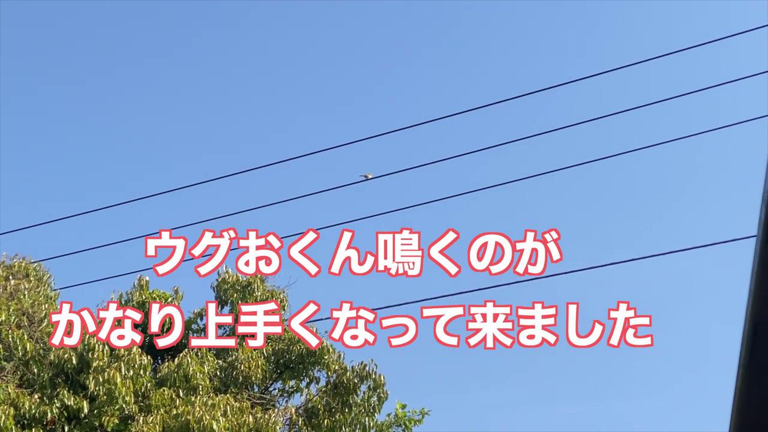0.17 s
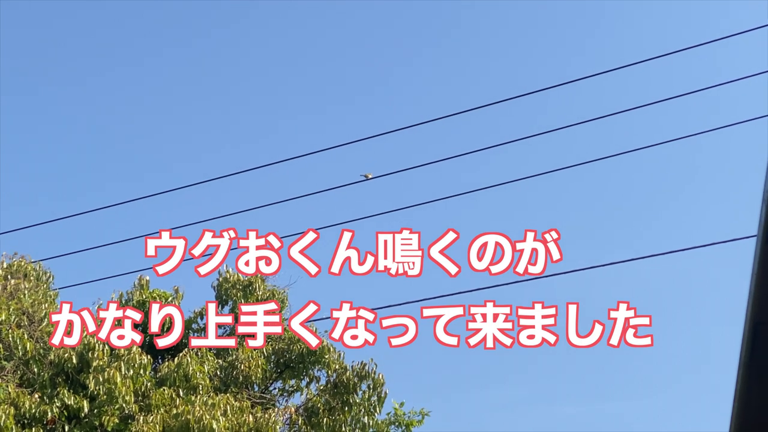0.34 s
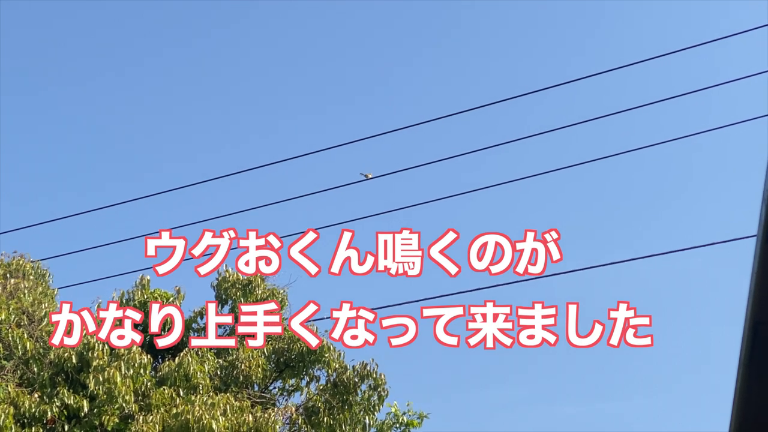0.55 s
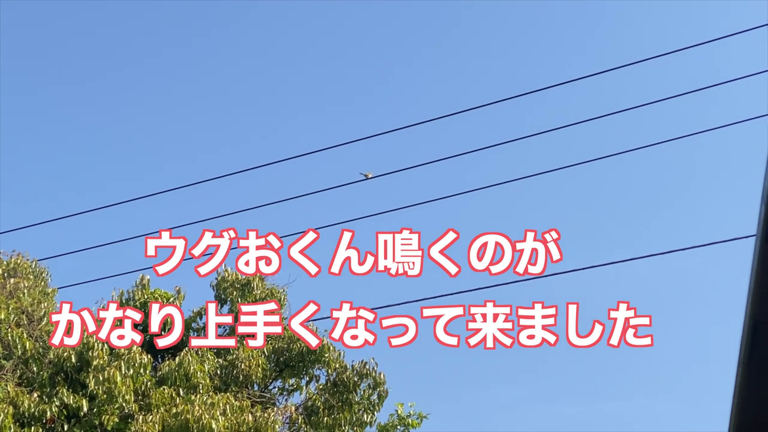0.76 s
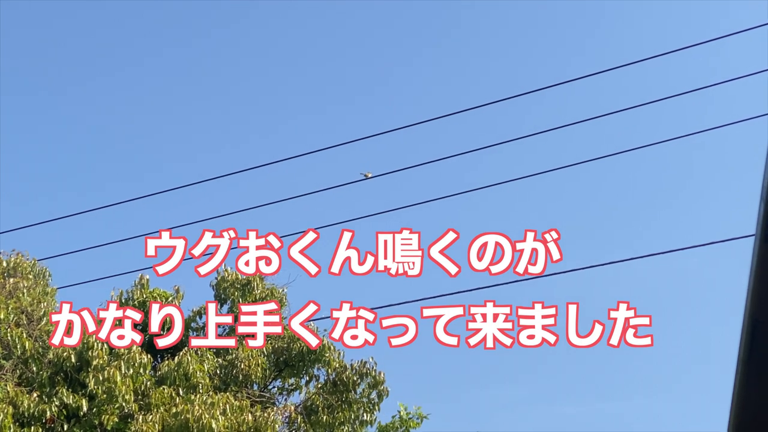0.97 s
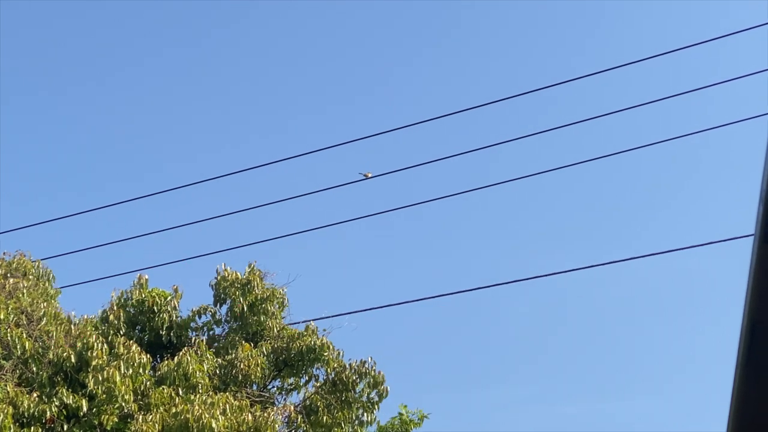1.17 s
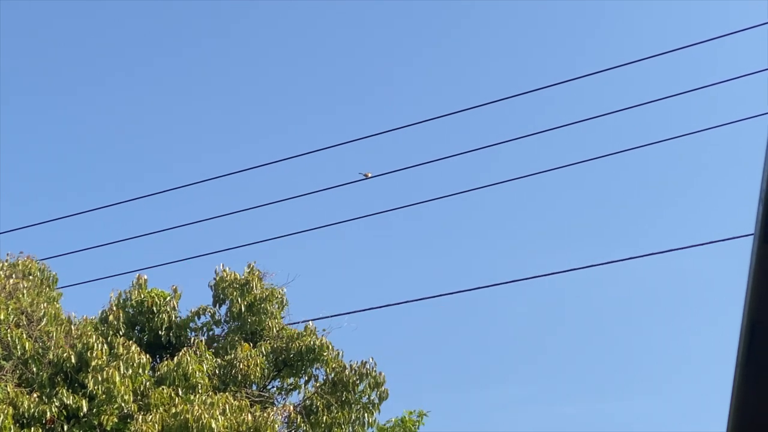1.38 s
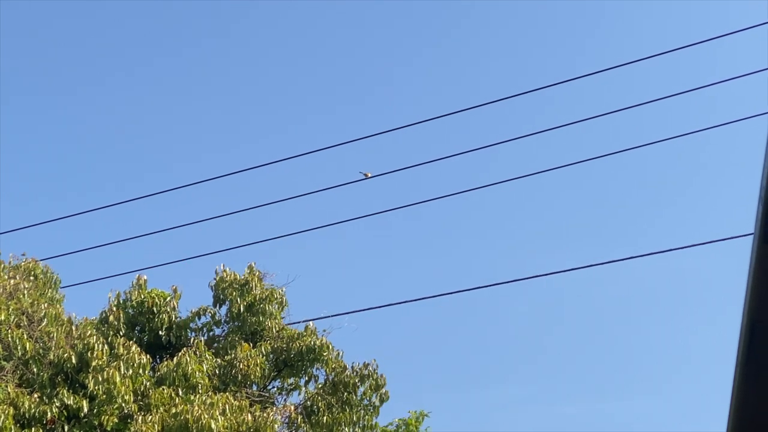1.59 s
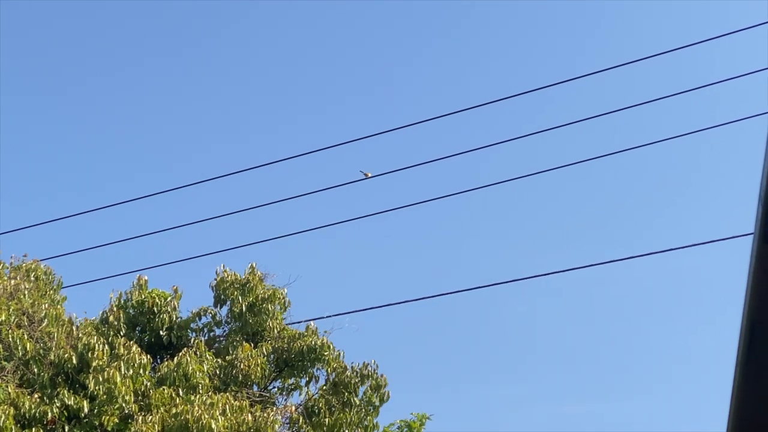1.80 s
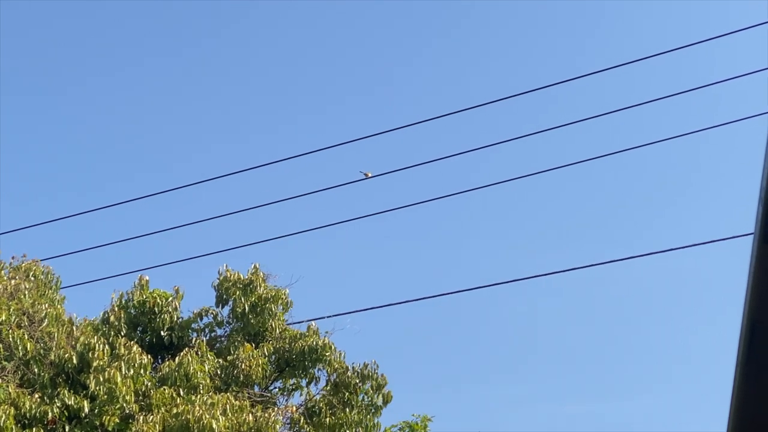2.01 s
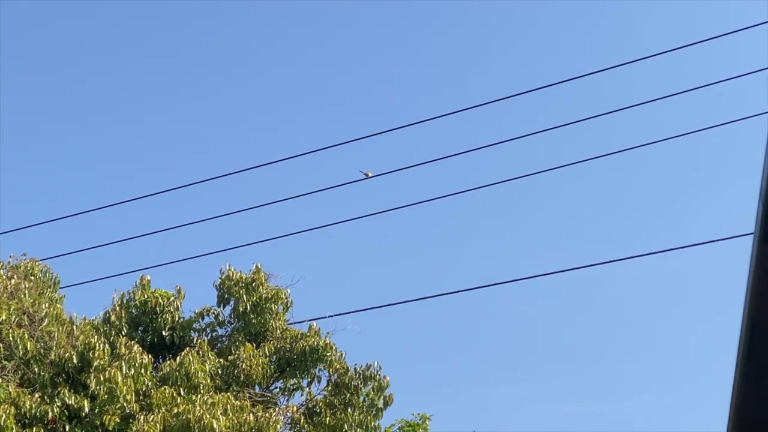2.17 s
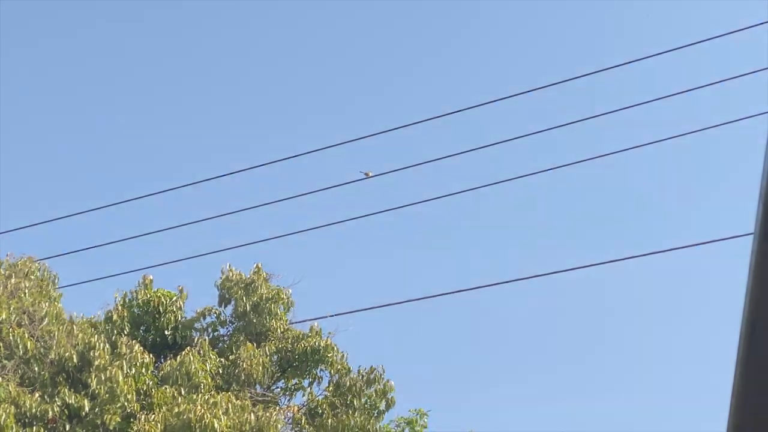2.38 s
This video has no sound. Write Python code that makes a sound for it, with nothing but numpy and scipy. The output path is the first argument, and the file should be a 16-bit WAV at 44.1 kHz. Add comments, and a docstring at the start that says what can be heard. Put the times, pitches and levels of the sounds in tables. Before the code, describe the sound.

A bush warbler sings outdoors, its clear low whistle swelling from the start and breaking into five even notes until 0.8 seconds. A louder, quick rising flourish follows, ending near 1 second in a whip-like downward sweep with brief reverberation. Faint distant birds, stirring leaves and a low, uneven rumble continue to about 2.5 seconds, with two soft, dull thumps near 1.3 and 2.1 seconds.

```python
"""A low whistle swells and breaks into five even notes: a bush warbler singing from a tree.
A quick, loud, rising flourish follows and ends in a whip-like downward sweep. Each part is a nearly
pure tone of varying frequency and amplitude, which the surroundings return as reflections and
reverberation. Other small birds call far off, over faint shaped noise (open air, stirring leaves,
a low, uneven rumble) and two dull thumps."""
import sys
import numpy as np
from scipy import signal
from scipy.fft import rfft, irfft
from scipy.io import wavfile
from scipy.ndimage import uniform_filter1d

SR = 44100
rng = np.random.default_rng(int(sys.argv[2]) if len(sys.argv) > 2 else 0)


def wav_record(signal):
    """Record a signal, one row per channel, as 16-bit PCM in the file named by sys.argv[1]."""
    frames = np.transpose(np.atleast_2d(signal))
    bounded = np.clip(frames, -1, 1)
    # unit amplitude maps onto the largest positive 16-bit level
    quanta = np.round(bounded * 32767).astype(np.int16)
    wavfile.write(sys.argv[1], SR, quanta)


N = 108045
TIME, FREQS = np.arange(N) / SR, np.fft.rfftfreq(N, 1 / SR)
BAND_LIMIT_HZ = 15700


def amp(db):
    """The decibel scale: 20 dB is a factor of ten in amplitude."""
    return 10 ** (np.asarray(db) / 20)


def unit_rms(x):
    """Normalisation to unit mean power."""
    return x / np.sqrt(np.mean(x ** 2) + 1e-20)


def curve_at(points, hz):
    """Interpolation of a curve on a logarithmic frequency axis."""
    f, value = np.transpose(points)
    return np.interp(np.log(hz + 1), np.log(f + 1), value)


def add(mix, start, sound):
    """Superposition: a sound adds to the mix from its start, in seconds."""
    part = mix[max(round(start * SR), 0):][:len(sound)]
    part += sound[:len(part)]


def delayed(x, seconds):
    """Propagation delay: the same wave arrives later."""
    return np.interp(np.arange(N) - seconds * SR, np.arange(N), x, left=0)


def phase_of(hz):
    """Phase is the time integral of angular frequency."""
    return 2 * np.pi * np.cumsum(hz) / SR


def wander(hz, count=N):
    """Random modulation: low-pass noise that fluctuates at rates up to about hz."""
    return unit_rms(irfft(rfft(rng.standard_normal(N)) * np.exp(-(FREQS / hz) ** 2), N))[:count]


def swell(middle, length, db):
    """Amplitude envelope: half a cosine cycle rises and falls around one moment."""
    return amp(db) * np.cos(np.pi * np.clip((TIME - middle) / length, -.5, .5))


def spread(a, b):
    """Partial coherence: the sum and difference of independent signals form left and right."""
    # likeness of the channels (frequency [Hz], coherence [0 to 1])
    coherence = [(30, 0.98), (110, 0.9), (190, 0.8), (330, 0.91), (600, 0.21), (1050, 0.36), (1500, 0.52),
                 (2200, 1), (3300, 0.9), (14000, 1)]
    size = len(a)
    alike = np.clip(curve_at(coherence, np.fft.rfftfreq(size, 1 / SR)), -1, 1)
    mid = irfft(rfft(a) * np.sqrt(1 + alike), size)
    side = irfft(rfft(b) * np.sqrt(1 - alike), size)
    return np.array([mid + side, mid - side])


def noise(spectrum):
    """Spectral shaping: white noise is filtered into coloured stereo noise of unit power."""
    white = rfft(rng.standard_normal((2, N)))
    return unit_rms(spread(*irfft(white * amp(curve_at(spectrum, FREQS)), N)))


def whistle(attack_s=0.009, release_s=0.011, sag_hz=27, waver=0.0035, arch_db=1, shimmer_db=1.33):
    """Harmonic tones: each note is a fundamental and a faint octave, sagging in pitch midway."""
    # whistled notes (start [s], length [s], final level [dB], pitch [Hz], swell [dB],
    # octave re fundamental [dB], pitch rise [Hz])
    notes = [(0.0, .178, -41.5, 955.7, 11.5, -18, -1), (0.207, 0.092, -37, 942, 1, -23, 33),
             (0.334, 0.081, -36, 955.3, 2, -19, 2), (.447, 0.079, -35, 954.3, 1.5, -20.5, 8),
             (0.556, .09, -35.5, 950.2, -1, -24, -5.5), (.679, .085, -32, 942.6, 6, -25.5, -6)]
    out = np.zeros(N)
    for start, length, db, hz, swell_db, octave_db, rise_hz in notes:
        t = np.arange(0, length, 1 / SR)
        progress = t / length
        bowl = (2 * progress - 1) ** 2  # 1 at the ends, 0 midway
        pitch = hz + rise_hz * (progress - .5) + sag_hz * (bowl - .25)
        phase = phase_of(pitch * (1 + waver * wander(82, len(t))))
        ramp = np.clip(np.minimum(t / attack_s, (length - t) / release_s), 0, 1)
        contour_db = db + swell_db * (progress - 1) + arch_db * (1 - bowl)
        envelope = np.sin(np.pi / 2 * ramp) ** 2 * amp(contour_db + shimmer_db * wander(90, len(t)))
        add(out, start, envelope * (np.sin(phase) + amp(octave_db) * np.sin(2 * phase)))
    return out


def background():
    """Amplitude-modulated noise: two uneven low bands and a growing hiss lie over steady air."""
    # noise spectra (frequency [Hz], relative spectral density [dB])
    boom_spectrum = [(22, -46), (30, -28), (38, -12), (51, 12.5), (66, -3), (82, -6), (105, -20.5),
                     (200, -55.5)]
    rumble_spectrum = [(55, -34), (95, -5), (135, 0), (185, -10), (250, -6.5), (350, -16), (520, -22.5),
                       (1100, -43), (2500, -61)]
    hiss_spectrum = [(500, -23.5), (1200, -6.5), (3000, 3.5), (7500, -0.5), (8500, -7), (12000, -9),
                     (13000, -26.5), (15500, -21.5)]
    air_spectrum = [(15, -32), (25, -12.5), (59, -2.5), (113, -12.5), (161, -9.5), (199, -9.5), (272, -6.5),
                    (532, -11.5), (603, -8.5), (728, -10.5), (1040, -10.5), (2120, -25), (3730, -31),
                    (4850, -69), (8210, -120)]
    # envelopes (time [s], relative level [dB])
    boom_levels = [(0, -54), (.25, -53), (.5, -54), (.66, -64), (1.04, -72.5), (1.12, -57), (1.22, -62),
                   (1.42, -58), (1.6, -60), (1.72, -64), (1.86, -48.5), (2.05, -55.5), (2.25, -63),
                   (2.45, -62)]
    rumble_levels = [(0.0, -59), (0.07, -47.5), (0.24, -51.5), (0.48, -45.5), (0.65, -55.5), (1.17, -65.5),
                     (1.4, -56), (1.43, -58.5), (1.61, -41.5), (1.66, -41.5), (1.69, -51.5), (1.71, -43.5),
                     (1.98, -49), (2.01, -44.5), (2.11, -50.5), (2.19, -46.5), (2.22, -57.5), (2.45, -64.5)]
    hiss_levels = [(0, -70.5), (0.799, -68), (1.3, -67.5), (1.7, -65.5), (2.1, -64), (2.45, -62.5)]
    boom = noise(boom_spectrum) * amp(np.interp(TIME, *np.transpose(boom_levels)))
    rumble = noise(rumble_spectrum) * amp(np.interp(TIME, *np.transpose(rumble_levels)))
    hiss = noise(hiss_spectrum) * amp(np.interp(TIME, *np.transpose(hiss_levels)))
    return amp(1) * boom + amp(-1.5) * rumble + hiss + amp(-55) * noise(air_spectrum)


def far_chirps(waver=0.0031):
    """Frequency modulation: distant birds slur each soft call along a parabola of pitch."""
    # calls (start [s], length [s], peak level [dB], first pitch [Hz], middle pitch [Hz], last pitch [Hz])
    calls = [(.01, 0.12, -59, 1460, 1440, 1320), (0.463, 0.12, -55, 3380, 3363, 3297),
             (0.586, 0.078, -50.5, 4335, 3915, 4100), (0.677, 0.047, -59, 4310, 4060, 3810),
             (1.113, 0.072, -56, 3440, 3340, 3156), (1.765, .07, -65, 2440, 2400, 2450),
             (2.182, .09, -62.5, 3570, 3570, 3570), (2.356, .1, -63, 4000, 4750, 5320)]
    out = np.zeros(N)
    for start, length, db, *pitches in calls:
        progress = np.arange(0, length, 1 / SR) / length
        pitch = np.polyval(np.polyfit([0, .5, 1], pitches, 2), progress)
        phase = phase_of(pitch * (1 + waver * wander(150, len(progress))))
        add(out, start, amp(db) * np.sin(np.pi * progress) * np.sin(phase))
    return out


def scatter(x, t60, build_s, taps_per_s=3000):
    """Reverberation: many small reflections from leaves and walls build up and decay exponentially."""
    t = np.arange(SR) / SR
    taps = rng.standard_normal((2, SR)) * (rng.random((2, SR)) < taps_per_s / SR)
    response = spread(*taps) * (1 - np.exp(-(t / build_s) ** 2)) * amp(-60 * t / t60)
    return signal.fftconvolve(x[None], response / np.linalg.norm(response[0]), axes=1)[:, :N]


def surroundings(song, notes):
    """Multipath propagation: early reflections, close scatter, a long tail and one distant echo."""
    # distinct close reflections (delay [s], gain [dB])
    reflections = [(0.0208, -24.5), (0.042, -27), (.058, -26.5)]
    early = sum(amp(db) * delayed(song, delay) for delay, db in reflections)
    rebound = amp(-13) * delayed(notes, seconds=.0255)  # the low whistle returns strongly from close by
    near = amp(-10) * scatter(song, t60=0.3, build_s=.008)
    tail = amp(-22) * scatter(song, t60=1.34, build_s=0.028)
    echo = amp(-38.5) * scatter(delayed(song, seconds=0.2), t60=0.096, build_s=0.0046)
    return early + rebound + near + tail + echo


def husk():
    """Band-limited noise: short bursts near the whistle's pitch turn it husky."""
    # husky band (frequency [Hz], relative spectral density [dB])
    spectrum = [(800, -38.5), (1050, -1), (1300, 0), (1600, -2), (1900, -11.5), (2500, -40.5), (5000, -69)]
    # husky moments (middle [s], length [s], peak level [dB])
    bursts = [(0.145, 0.1, -57), (0.221, 0.025, -54.5), (0.287, 0.015, -58), (0.401, 0.023, -54.5),
              (0.571, 0.021, -58.5), (0.624, 0.021, -52), (0.706, 0.039, -53.5)]
    return noise(spectrum)[0] * sum(swell(*burst) for burst in bursts)


def rustles():
    """Broadband noise: foliage stirs in brief, faint swells of treble."""
    # leaf noise (frequency [Hz], relative spectral density [dB])
    spectrum = [(1500, -31), (4000, -3.5), (6500, 0), (8500, -2.5), (12000, -4.5), (15000, -9)]
    # stirrings (middle [s], length [s], peak level [dB])
    stirs = [(.68, 0.1, -73), (1.283, .06, -70.5), (1.696, 0.13, -69.5), (2.13, 0.13, -69),
             (2.324, 0.17, -69)]
    return noise(spectrum) * sum(swell(*stir) for stir in stirs)


def glide(contour, jitter_rad=0.11):
    """Harmonic series on a gliding fundamental; fast phase jitter broadens the weak overtones."""
    # overtone strength (frequency [Hz], level re fundamental [dB])
    strengths = [(2700, -37.5), (3700, -42), (4400, -68), (7900, -66), (8700, -40), (9350, -35),
                 (9800, -62), (12500, -58), (15000, -68)]
    times, hz, db = np.transpose(contour)
    sounding = (TIME > times[0]) * (TIME < times[-1])
    pitch = uniform_filter1d(np.interp(TIME, times, hz), size=90)
    envelope = uniform_filter1d(amp(np.interp(TIME, times, db)) * sounding, size=60)
    phase = phase_of(pitch)
    jittered = phase + jitter_rad * wander(400)
    overtones = sum(amp(curve_at(strengths, k * pitch)) * (k * pitch < BAND_LIMIT_HZ) * np.sin(k * jittered)
                    for k in range(2, 9))
    return envelope * (np.sin(phase) + overtones)


def flourish():
    """Frequency modulation: a loud tone arches twice, higher the second time."""
    # path of the tone (time [s], pitch [Hz], level [dB])
    contour = [(.811, 1326, -62), (.82, 1535, -27), (.83, 1550, -20.5), (.84, 1520, -26),
               (.852, 1358, -23.5), (.861, 1292, -38), (.871, 1452, -27.5), (.881, 1611, -22.5),
               (.892, 1772, -17.5), (.902, 1858, -21.5), (.915, 1845, -19.5), (.924, 1770, -35)]
    return glide(contour)


def thin_ring(centre_hz=5070, deviation_hz=40):
    """Random frequency modulation: a faint, unsteady high tone sounds over the flourish."""
    pitch = centre_hz + deviation_hz * wander(250)
    return swell(middle=0.894, length=.15, db=-63) * np.sin(phase_of(pitch))


def whip_sweep():
    """Interference: a steep downward chirp overlaps its own reflection from a near surface."""
    # path of the chirp (time [s], pitch [Hz], level [dB])
    contour = [(.952, 4130, -57), (.955, 3563, -28.5), (.96, 2755, -20.5), (.965, 2348, -20),
               (.968, 1995, -20), (.972, 1865, -27.5)]
    direct = glide(contour)
    return direct + amp(-6) * delayed(direct, seconds=0.007)


def snap():
    """A broadband transient: a burst of bright noise sharpens the sweep."""
    # colour of the burst (frequency [Hz], relative spectral density [dB])
    spectrum = [(3500, -15), (5200, -1), (6500, -17), (8500, -18), (11500, -6), (13000, -15.5),
                (14500, -12), (16000, -29)]
    return noise(spectrum)[0] * swell(middle=0.96, length=0.026, db=-55)


def far_twitters(width_hz=346):
    """Sidebands: random amplitude modulation blurs distant bird tones into narrow bands of noise."""
    # twitters (middle [s], length [s], peak level [dB], pitch [Hz])
    twitters = [(1.296, .07, -64.5, 3535), (1.33, .04, -61.5, 3100), (1.428, 0.13, -64, 3520),
                (1.54, 0.057, -64.5, 3600), (2.05, 0.33, -68, 2590)]
    return sum(swell(middle, length, db) * unit_rms(wander(width_hz) * np.sin(2 * np.pi * hz * TIME))
               for middle, length, db, hz in twitters)


def thumps(rise_s=0.026):
    """Damped oscillation: soft, deep thuds ring for a few cycles."""
    # thuds (start [s], level the decay starts from [dB], pitch [Hz], time to fall 60 dB [s])
    thuds = [(1.266, -38, 52.8, 0.44), (2.134, -38, 55.6, 0.23)]
    t, out = np.arange(SR) / SR, np.zeros(N)
    for start, db, hz, t60 in thuds:
        envelope = np.minimum(t / rise_s, 1) * amp(db - 60 * t / t60)
        add(out, start, envelope * np.sin(2 * np.pi * hz * t))
    return out


def scene():
    """Superposition: direct sound, reflections and background add at the microphone."""
    sweep = whip_sweep()
    notes = whistle()
    song = notes + husk() + snap() + flourish() + sweep
    warbler = song + surroundings(song, notes) + thin_ring()
    calls = far_twitters() + far_chirps()
    far_birds = calls + amp(-6.5) * scatter(calls, t60=0.29, build_s=0.0095)
    return warbler + far_birds + background() + rustles() + thumps()


def record(dry):
    """Interchannel differences: two microphone ports differ in phase and level; a low-pass follows."""
    # phase difference of the ports (frequency [Hz], lead of left over right [rad])
    port_phase = [(300, 0), (800, 0.76), (1380, 0.17), (2000, -0.53), (2700, 0.67), (3450, 0.74),
                  (5000, 0.06), (7000, 0.9), (9000, 1.34), (13000, 1.5)]
    # level difference of the ports (frequency [Hz], left minus right [dB])
    port_balance = [(60, -1.5), (400, -1.4), (900, -.3), (1400, -1.2), (2100, 0), (8000, -0.15)]
    # each channel takes half of the difference
    left = amp(curve_at(port_balance, FREQS) / 2) * np.exp(1j * curve_at(port_phase, FREQS) / 2)
    heard = irfft(rfft(dry) * np.array([left, 1 / left]), N)
    low_pass = signal.firwin(511, BAND_LIMIT_HZ, window=("kaiser", 9), fs=SR)
    return signal.oaconvolve(heard, low_pass[None], "same")


dry = scene()
out = record(dry)
wav_record(out)
```